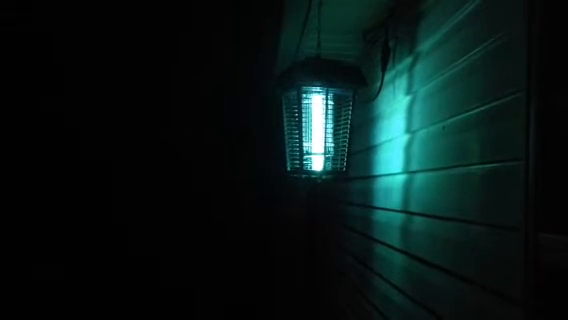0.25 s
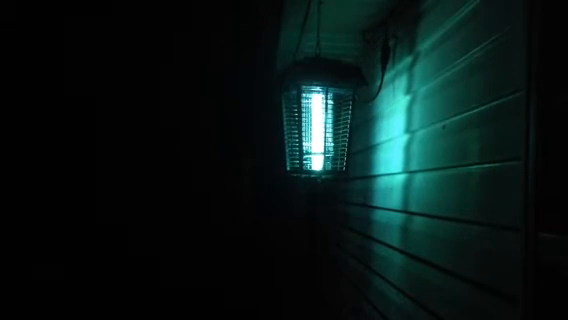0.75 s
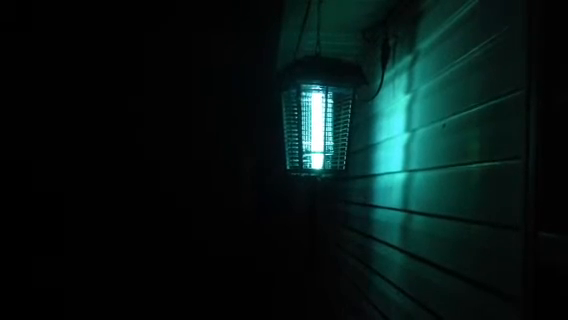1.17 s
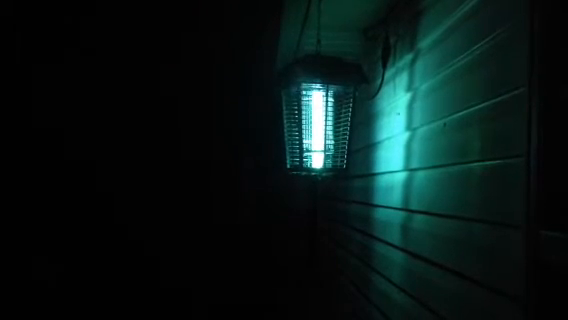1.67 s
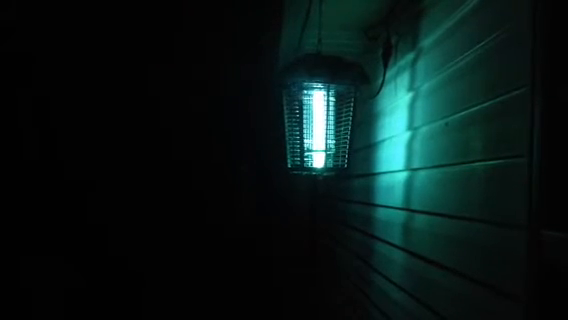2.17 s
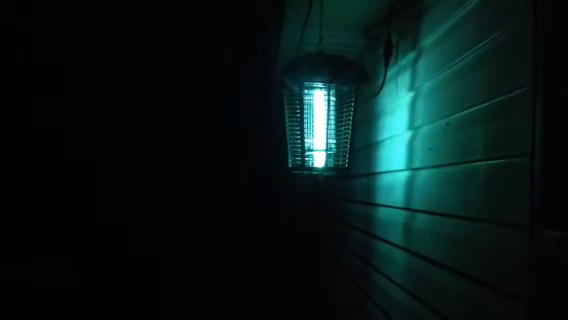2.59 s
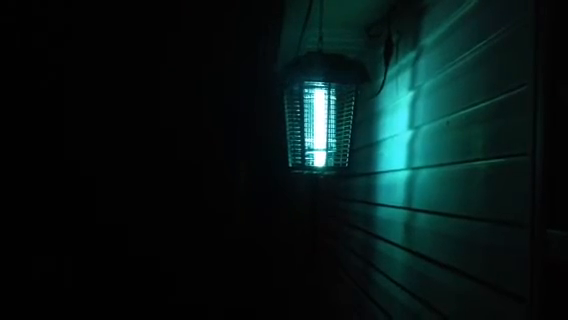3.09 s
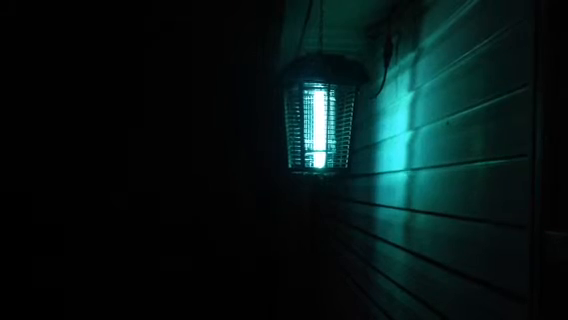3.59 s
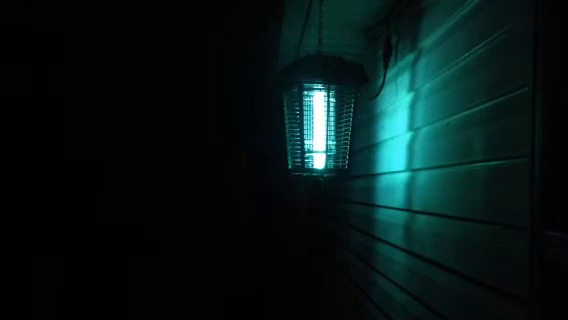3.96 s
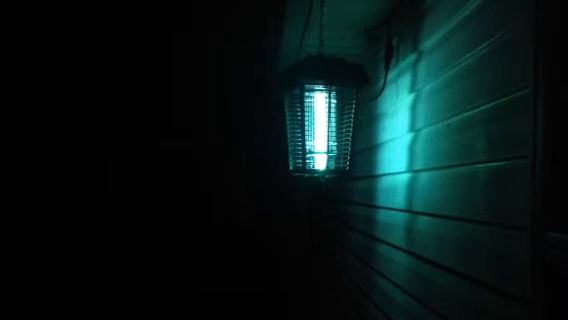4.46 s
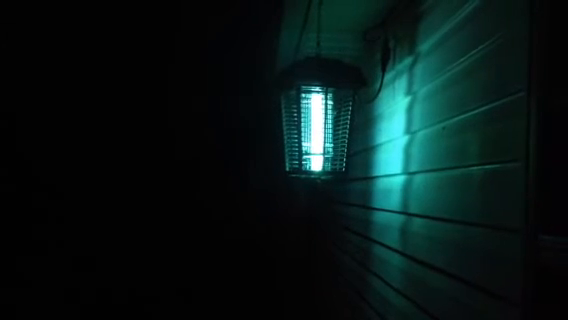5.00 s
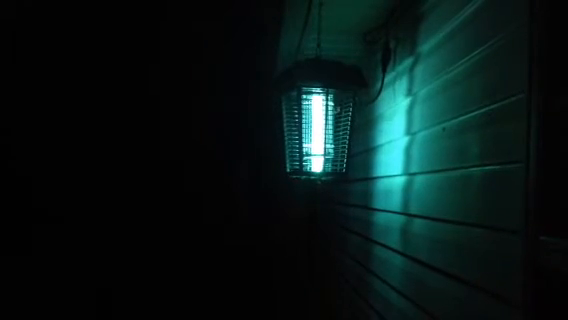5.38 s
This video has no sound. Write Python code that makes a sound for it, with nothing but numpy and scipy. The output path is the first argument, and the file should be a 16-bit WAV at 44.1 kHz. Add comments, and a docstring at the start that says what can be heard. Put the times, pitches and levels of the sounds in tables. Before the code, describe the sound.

An electric insect trap hanging by an outdoor wall at night. A thin, very bright fizz flutters and wavers, then swells into a harsh sputtering buzz. Around two to three seconds a dense burst of dry pops and snaps breaks it up, after which the sizzle steadies, with a few late pops. Close, dry mono pickup with a short wall reflection; faint hum and quiet night air underneath.

```python
"""A harsh electric fizz pulses on twice the mains frequency, then sputters and pops:
an insect burns on the high-voltage grid of a lamp trap that hangs by a wall outdoors at night.
An arc strikes on every half-cycle of the mains and makes noise for part of it; the bursting body pops.
The wire cage colours the sparks, the wall returns a short tail, and transformer and lamp hum faintly
over the quiet night."""
import sys
import numpy as np
from scipy import signal
from scipy.fft import rfft, irfft
from scipy.io import wavfile

SR = 44100
rng = np.random.default_rng(int(sys.argv[2]) if len(sys.argv) > 2 else 0)


def transcribe(u):
    """Save the signal u as a 16-bit wav file named by the first command-line argument.

    u: samples, shape (n,) or (channels, n), limited to [-1, 1]; the rate is SR.
    q: integer samples, one column per channel.
    """
    v = np.clip(np.atleast_2d(u).T, -1, 1)
    q = np.round(v * 32767).astype(np.int16)
    wavfile.write(sys.argv[1], SR, q)


N = 248724
MAINS_HZ = 60

# Spectrum of the fizz. Each row: frequency in Hz, relative density in dB per Hz.
FIZZ_SPECTRUM = [(800, -40), (2000, -36.5), (3450, -19), (5500, -19.5), (6900, -9.5), (9500, -8),
                 (12000, -4.5), (14300, 0), (15400, -4.5)]
# Bands that the cage cancels or lifts for sparks at the first place on the grid.
# Each row: centre in Hz, width in Hz, gain in dB.
CAGE_FIRST_PLACE = [(2450, 300, 5), (2950, 250, -6), (4050, 200, -11), (4820, 250, -6), (6250, 600, -10),
                    (7850, 250, -14), (8790, 300, -6), (9560, 150, -6), (10160, 220, -13),
                    (11030, 200, -16), (11970, 180, -15), (12750, 350, -15), (13400, 900, -4),
                    (14400, 400, 3), (14820, 200, -6)]
# The band that the lower sounds miss. Each row: centre in Hz, width in Hz, gain in dB.
BODY_BAND = [(3670, 1270, -9.5)]


def from_db(db):
    """Amplitude ratio of a level: twenty decibels are a factor of ten."""
    return 10 ** (np.asarray(db) / 20)


def rms_one(x):
    """Normalisation by the root of the mean power, to rms 1."""
    return x / np.sqrt(np.mean(x ** 2) + 1e-20)


def in_time(rows, t):
    """Linear interpolation of a table's columns at the times t."""
    s, *columns = np.transpose(rows)
    return [np.interp(t, s, c) for c in columns]


def colour(x, spectrum, cage=()):
    """Minimum-phase filtering: the spectrum and narrow bands fix the causal response; white rms is kept."""
    hz = np.linspace(1, SR / 2, 2049)
    points_hz, points_db = np.array(spectrum).T
    db = np.interp(np.log(hz), np.log(points_hz), points_db)
    db = db + sum(gain / (1 + (2 * (hz - centre) / width) ** 2) for centre, width, gain in cage)
    # folding the cepstrum onto positive times makes the phase minimal
    cepstrum = irfft(np.log(from_db(db)))
    cepstrum[1:2048] *= 2
    cepstrum[2049:] = 0
    response = irfft(np.exp(rfft(cepstrum)))
    return signal.fftconvolve(x, rms_one(response) / 64)[:N]  # 4096 points: unit energy


def arc():
    """Gas discharge: fizz, sputter and throb live only while the gap is broken down in each half-cycle."""
    # Strength of the arc. Each row: time in seconds, fizz level in dB before the variations.
    strength = [(0, -23.5), (.15, -32), (.33, -29.5), (.39, -23), (.56, -30), (.7, -25), (.8, -19),
                (.95, -18.5), (1.04, -24.5), (1.1, -25.5), (1.15, -25.5), (1.19, -24), (1.3, -18),
                (1.37, -24.5), (1.43, -15), (1.46, -20.5), (1.5, -22.5), (1.57, -16.5), (1.87, -17),
                (2.0, -20), (2.1, -17.5), (2.23, -21), (2.3, -19.5), (2.48, -20), (2.62, -20), (2.88, -20),
                (2.93, -23.5), (3.12, -19), (3.16, -20.5), (3.6, -19.5), (4.4, -21), (4.58, -23),
                (4.68, -19), (4.95, -23.5), (5.08, -19), (5.28, -21.5), (5.36, -18), (5.46, -18.5),
                (5.5, -25.5), (5.64, -19)]
    # Stages of the burning. Each row: time in seconds, nominal burn on the upswing and on the downswing
    # in ms, upswing over downswing in the fizz and in the sputter in dB, sputter level at middling
    # strength in dB, throb over fizz in dB before its spectrum shapes it.
    stages = [(.05, 2.9, 2.6, 7, 3, -64, -45), (.2, 1.58, 1.74, -2.5, 0, -78, -43.5),
              (.75, 0.95, 1.5, -2, -22, -67, -39.5), (.92, 1.77, 2.5, 2.5, -14, -71, -37.5),
              (1.15, 1.36, 1.52, -1, -11, -68, -41), (1.33, 1.56, 3.1, -2, -3, -76, -38),
              (1.45, 3.2, 5.4, 2, -4, -63, -32.5), (1.6, 5.7, 8.7, 1.5, 3, -50.5, -33.5),
              (1.7, 6, 5.5, 0, 2, -53, -34), (2.02, 4.8, 10, -3, -20, -58.5, -31),
              (2.1, 4, 6, -6, -6, -50.5, -37), (2.2, 4.8, 6.9, 0, 10, -45.5, -32),
              (2.45, 4.7, 3.84, 2, -1.5, -43, -32), (2.58, 6, 4.1, 5, -9.5, -38, -30),
              (2.75, 5.5, 4.4, -4, -12, -42, -30), (2.9, 5.5, 4.8, 2, -5, -35.5, -32),
              (3.0, 4.1, 4.8, 0, 3, -40.5, -42), (3.12, 5.5, 5.5, 3.5, 2, -41.5, -45),
              (3.2, 4.66, 5.16, 2.5, 13.5, -52, -38), (3.9, 5.5, 5.5, 2, 7, -46.5, -34.5),
              (4.4, 6.1, 6.8, 1.5, 3, -50.5, -51), (4.6, 6, 5.1, -3.5, -5.5, -48.5, -41),
              (5.0, 2.5, 5, 5.5, 4.5, -45, -41), (5.3, 4.1, 8.2, -5, -11, -53, -42),
              (5.38, 6.5, 6.3, 5, 8, -43, -48), (5.45, 4.6, 3.3, 1, 0, -40.5, -37),
              (5.6, 3.7, 4.8, -3, -5, -42.5, -43)]
    # Character. Each row: time in seconds, power share of the second place on the grid 0-1,
    # weight of regular restrikes 0-1, their mean spacing in ms.
    character = [(0, 0, .92, 1.5), (1.25, 0, .9, 1.5), (1.55, 0, .35, 1.3), (2.1, 0, .25, 1.3),
                 (2.3, .3, .25, 1.4), (2.75, .4, .3, 1.4), (3.13, .65, .35, 1.5), (3.17, 1, .86, 1.5),
                 (3.3, 1, .86, 1.75), (3.5, 1, .86, 1.5), (3.75, 1, .86, 1.75), (4.05, 1, .84, 1.5),
                 (4.22, 1, .75, 1.1), (4.45, 1, .6, 1.0), (5.64, 1, .45, 1.05)]
    # Bands the cage changes from the second place. Each row: centre in Hz, width in Hz, gain in dB.
    cage_second_place = [(2800, 500, 4), (4000, 1500, -8), (5450, 700, -8), (5940, 350, 6), (6200, 150, -4),
                         (7580, 350, -14), (8250, 300, -6), (9300, 200, -10), (9650, 350, 5),
                         (10100, 250, -15), (11280, 500, 3), (12230, 450, 5), (12680, 250, -13),
                         (13350, 600, 3), (14640, 450, -10)]
    # Spectrum of the sputter. Each row: frequency in Hz, relative density in dB per Hz.
    sputter_spectrum = [(60, -34.5), (130, -6), (300, 2), (700, 0.5), (2000, 1), (3500, -4.5), (6000, 1.5),
                        (12000, -21)]
    # Spectrum that shapes the throb. Each row: frequency in Hz, relative density in dB per Hz.
    throb_spectrum = [(60, -3.5), (120, -12), (240, 5.5), (360, 1), (600, -3.5), (1200, 15), (2500, -18.5)]
    # the sputter swings more widely than the fizz about a middling strength
    sputter_follows, middling_db = 1.9, -21  # dB per dB, dB
    # regular restrikes even out the half-cycles
    uneven_db, steadied_db = 3, 5.1

    t = np.arange(N) / SR
    half = (t * 2 * MAINS_HZ).astype(int)
    middle = (half + .5) / (2 * MAINS_HZ)
    luck = rng.standard_normal((half[-1] + 1, 4))[half].T  # one draw per half-cycle
    fizz_db, = in_time(strength, middle)
    up, down, fizz_tilt, sputter_tilt, sputter_db, throb_db = in_time(stages, middle)
    sputter_db = sputter_db + sputter_follows * (fizz_db - middling_db)
    second, regular, spacing = in_time(character, middle)
    spread_db = uneven_db - steadied_db * regular
    second = np.clip(second, 0, 1)
    irregular = np.sqrt(1 - np.clip(regular, 0, 1) ** 2)
    side = np.where(half % 2 == 0, .5, -.5)  # upswing, downswing

    burn, since, alive = breakdown(t, half, middle, up, down, luck)
    alive *= from_db(spread_db * luck[2])
    regular_sparks = regular * restrikes(since, burn, spacing, luck[3])

    bright = alive * from_db(fizz_db + side * fizz_tilt)
    fizz = bright * sparks(16000, 1.8) * rng.choice([-1, 1], N) * irregular
    fizz += echoes(bright) - 0.54 * scatter(bright * regular_sparks)
    dull = alive * from_db(sputter_db + side * sputter_tilt + luck[0])
    sputter = -dull * (sparks(3500, 2.16) * irregular + regular_sparks)
    sputter += 1.05 * echoes(dull)
    # the heated air swells with every burn: a buzz on twice the mains frequency
    throb = colour(-bright * from_db(throb_db), throb_spectrum)

    first_place = colour(fizz * np.sqrt(1 - second), FIZZ_SPECTRUM, CAGE_FIRST_PLACE)
    second_place = colour(fizz * np.sqrt(second), FIZZ_SPECTRUM, cage_second_place)
    return first_place + second_place + colour(sputter, sputter_spectrum, BODY_BAND) + throb


def breakdown(t, half, middle, up, down, luck):
    """Dielectric breakdown: the gap conducts from strike to extinction; gives burn, ms since strike, gain."""
    # Single half-cycles stand out. Each row: time in seconds, change in dB.
    flares = [(.154, 7.5), (.204, -1), (.246, 3.5), (.363, -4), (.596, -2), (.379, 4.5), (.396, 2.5),
              (.438, 9), (.679, 6), (.746, 3), (1.038, 6.5), (1.163, 7), (1.196, 8), (1.229, -1),
              (1.329, 0), (1.496, 8), (1.512, 6.5), (2.104, 8), (2.404, 1.5), (2.421, 3.5), (2.454, 4.5),
              (2.471, 4.5), (2.487, 3), (2.537, 4), (2.663, 1), (2.796, 5), (2.954, 5), (3.062, -0.5),
              (3.404, 4.5), (3.421, 4.5), (3.913, 8.5)]
    # The arc breaks off. Each row: start in seconds, length in seconds, change in dB.
    breaks = [(.033, .117, -17), (.167, .033, -10), (.217, .008, -14), (1.2, .008, -23), (1.533, .008, -14),
              (2.242, .008, -8), (2.375, .017, -10), (2.408, .008, -6), (2.5, .033, -35), (2.55, .008, -20),
              (2.8, .008, -13), (3.008, .008, -27), (3.025, .017, -46), (3.067, .008, -5), (4.5, .017, -11),
              (4.567, .025, -12.5), (5.133, .008, -10), (5.483, .075, -16), (5.567, .008, -8)]
    # a long burn strikes later after the zero crossing
    strike_ms, strike_per_burn = .42, .19  # ms, ms per ms
    strike = strike_ms + strike_per_burn * np.minimum((up + down) / 2, 6)
    # long burns vary in length, short ones are steady
    burn = np.where(half % 2 == 0, up, down)
    burn = np.clip(burn * np.exp(.035 * (burn - 1.5) * luck[0]), 1.2, 6.4)
    strike = strike + .03 * np.clip(burn - 2.0, 0, 9) * luck[1]
    since_crossing = (t - middle) * 1000 + 250 / MAINS_HZ
    since = since_crossing - strike
    alive = np.clip(since / .6, 0, 1) * np.clip((burn - .2 - since) / .4, 0, 1)
    alive *= np.sqrt(500 / MAINS_HZ / burn)  # a short burn is denser in power
    change_db = np.zeros(half[-1] + 1)
    change_db[[int(s * 2 * MAINS_HZ) for s, db in flares]] = np.array(flares)[:, 1]
    breaks_db = sum(db * ((middle > s) & (middle < s + length)) for s, length, db in breaks)
    return burn, since, alive * from_db(change_db[half] + breaks_db)


def restrikes(since, burn, spacing, luck):
    """Relaxation oscillation: the gap recharges and fires again at even steps within a half-cycle."""
    interval = spacing * (1 + .02 * np.clip(burn - 2.0, 0, 9) * luck)
    step = np.floor(since / interval + .65)
    fires = np.diff(step, prepend=0) == 1
    sizes = from_db(1.2 * rng.standard_normal(N))
    return np.sqrt(spacing * SR / 1000) * fires * sizes


def sparks(per_s, spread_db):
    """Shot noise: random discharges with a long-tailed size, at rms 1."""
    sizes = from_db(spread_db * np.minimum(rng.exponential(1, N), 4))
    return rms_one(sizes * (rng.random(N) < per_s / SR))


def scatter(x, share=0.92):
    """Allpass dispersion: sparks bouncing among the wires smear over milliseconds, colour unchanged."""
    # Paths between the wires. Each entry: delay in ms.
    paths = [.09, .2, .34]
    for ms in paths:
        a = np.r_[1, np.zeros(round(ms * SR / 1000) - 1), -share]
        x = signal.lfilter(a[::-1], a, x + 1e-18)
    return x


def echoes(alive):
    """Diffuse reverberation: countless small reflections as noise whose power trails that of the arc."""
    # Echoes of eaves, ground and yard. Each row: decay time by 60 dB in seconds, level in dB.
    decays = [(.02, -15), (.17, -8.5)]
    power = 0
    for t60, db in decays:
        r = from_db(-120 / (t60 * SR))  # decay of power, not of amplitude
        power = power + from_db(2 * db) * signal.lfilter([1 - r], [1, -r], alive ** 2)
    return np.sqrt(power) * rng.standard_normal(N)


def pops():
    """Impulse excitation: each burst gives two pressure dips, then a push that rings damped low modes."""
    # The body bursts. Each row: time in seconds, relative crack level in dB, thud over crack in relative dB.
    bursts = [(0.4355, -37, -23), (1.661, -24, -32), (2.113, -18, -10), (2.1262, -23.5, -11),
              (2.1788, -16, -10), (2.2618, -13.5, -9), (2.2643, -23, -4), (2.2789, -21, -8),
              (2.313, -18.5, -10.5), (2.3353, -15, -12.5), (2.4214, -22, -23), (2.5444, -13.5, -12.5),
              (2.5616, -19, -5), (2.5942, -13.5, -16), (2.6117, -26, -5), (2.6295, -13.5, -8.5),
              (2.6613, -14, -12), (2.6971, -17.5, -8), (2.7115, -17.5, -9), (2.7264, -33, -2),
              (2.748, -25, -13), (2.7615, -31, 4), (2.7942, -26.5, 12.5), (2.7968, -22.5, -4),
              (2.811, -29, 4), (2.8271, -32, 1), (2.846, -28, -2), (2.8714, -24, -3), (2.877, -24, -6),
              (2.8865, -19, -8), (2.8937, -19.5, -8), (2.962, -21, -9.5), (3.0027, -26, -6),
              (3.0201, -31, -4), (3.0622, -20.5, -9), (3.1215, -19, -29), (3.139, -25, -7.5),
              (3.4024, -35, -13), (3.4178, -41, 7), (3.9108, -17.5, -15), (3.9351, -22.5, -14),
              (5.034, -23.5, -16), (5.394, -17.5, -5.5), (5.422, -19, -15), (5.4348, -20, -26),
              (5.4431, -15, 0.5)]
    # Spectrum of the crack. Each row: frequency in Hz, relative density in dB per Hz.
    crack_spectrum = [(150, -16), (400, -5.5), (1000, 2), (2500, -0.5), (5500, -2), (7000, 2), (14000, -30)]
    # Modes of the thud. Each row: frequency in Hz, level in dB, decay time by 60 dB in seconds.
    thud_modes = [(240, -9, 0.013), (446, -7, 0.0055)]
    s, crack_db, thud_db = np.transpose(bursts)
    at, luck = (s * SR).astype(int), rng.random((len(s), 2))
    dips, push = np.zeros(N), np.zeros(N)
    dips[at] = -from_db(crack_db + 19)
    # a weaker dip comes a fraction of a millisecond before the main one
    early = at - (14 + 14 * luck[:, 0]).astype(int)
    dips[early] = -from_db(crack_db + 12 - 10 * luck[:, 1])
    push[at + 8] = from_db(crack_db + thud_db + 10)
    out = colour(dips, crack_spectrum, BODY_BAND) * from_db(-7)
    out += colour(dips, FIZZ_SPECTRUM, CAGE_FIRST_PLACE) * from_db(0.5)
    push = signal.sosfilt(signal.butter(2, 140, "high", fs=SR, output="sos"), push + 1e-18)
    for hz, db, t60 in thud_modes:
        r, w = from_db(-60 / (t60 * SR)), 2 * np.pi * hz / SR
        out += signal.lfilter([0, from_db(db) * np.sin(w)], [1, -2 * r * np.cos(w), r * r], push)
    return out


def wall(x):
    """Early reflection: the near wall answers the treble with one short cluster of dense arrivals."""
    t60, level_db = .03, -14  # s, dB
    t = np.arange(round(t60 * SR)) / SR
    tail = rng.standard_normal(len(t)) * from_db(-60 * t / t60)
    tail *= np.clip(t / 0.0031, 0, 1)
    x = signal.sosfilt(signal.butter(2, 2500, "high", fs=SR, output="sos"), x)
    return from_db(level_db) * signal.fftconvolve(x, tail / np.sqrt(np.sum(tail ** 2)))[:N]


def hum():
    """Mains harmonics of transformer and lamp, and a low drone that slides up and fades, as sine tones."""
    # The mains tone comes with the load. Each row: time in seconds, level at 120 Hz and at 480 Hz
    # in dB rms, drone frequency in Hz, drone level in dB rms, all ahead of the microphone.
    levels = [(0, -85, -70.5, 121.8, -67), (.75, -85, -63.5, 124, -66), (.95, -85, -64, 129, -63),
              (1.45, -84, -66, 128.5, -60), (1.65, -69, -75, 132, -76), (2.2, -62, -77, 132, -86),
              (3.3, -70, -80, 130, -90), (5.64, -81, -78, 132, -88)]
    mains_db, lamp_db, drone_hz, drone_db = in_time(levels, np.arange(N) / SR)
    out = np.zeros(N)
    for hz, db in ((2 * MAINS_HZ, mains_db), (8 * MAINS_HZ, lamp_db), (drone_hz, drone_db)):
        cycles = np.cumsum(hz + np.zeros(N)) / SR + rng.random()
        out += np.sqrt(2) * from_db(db) * np.sin(2 * np.pi * cycles)
    return out


def night():
    """Stationary ambient noise: many distant sources add up to a Gaussian signal with a fixed spectrum."""
    # Spectrum of the night. Each row: frequency in Hz, relative density in dB per Hz.
    night_spectrum = [(40, -26), (110, -4), (300, -3), (600, -8), (1300, -12.5), (2800, -12.5), (6300, -10),
                      (15000, -21)]
    return from_db(-56) * colour(rng.standard_normal(N), night_spectrum)


def scene():
    """Superposition: the trap and the wall behind it over the quiet night, in one channel."""
    trap = arc() + pops()
    return (trap + wall(trap) + hum() + night())[None]


def record(dry):
    """Band limiting: the microphone drops deep bass; the top falls in two zero-phase steps."""
    x = signal.sosfilt(signal.butter(2, 110, "high", fs=SR, output="sos"), dry)
    # the first step leaves a little of the top, the second ends it
    x = .04 * x + signal.sosfiltfilt(signal.ellip(8, .3, 30, 15260, fs=SR, output="sos"), x)
    return signal.sosfiltfilt(signal.ellip(8, .3, 35, 15830, fs=SR, output="sos"), x)


dry = scene()
out = record(dry)
transcribe(out)
```